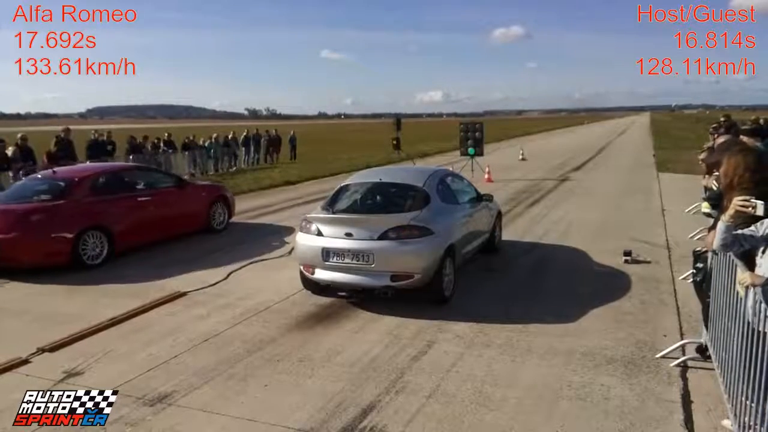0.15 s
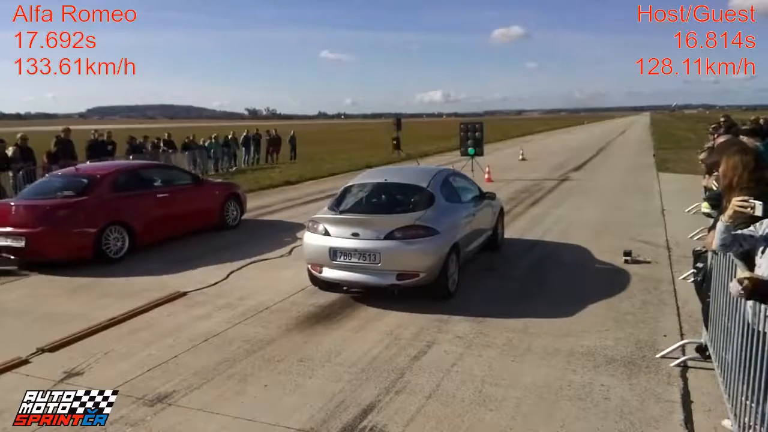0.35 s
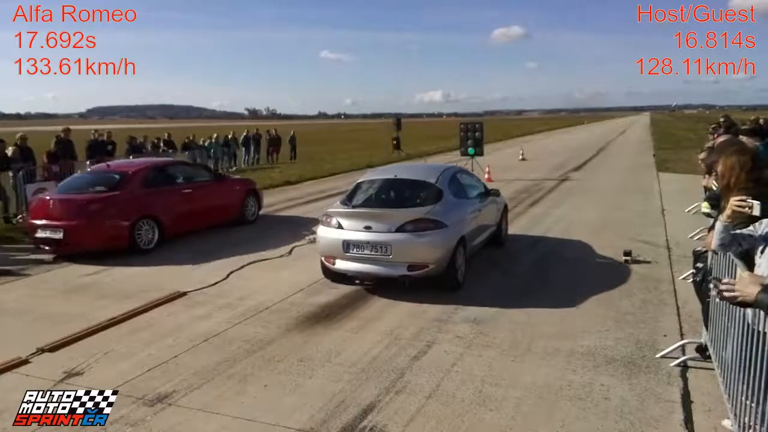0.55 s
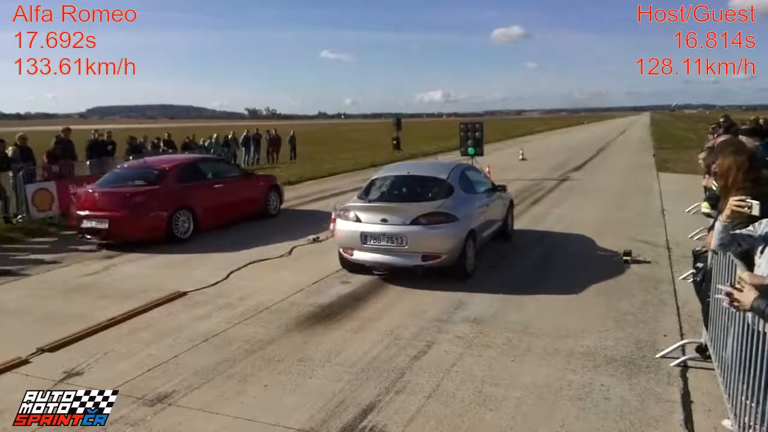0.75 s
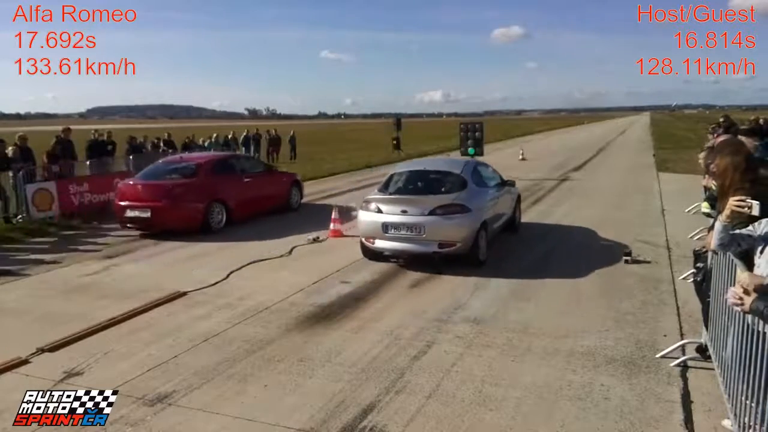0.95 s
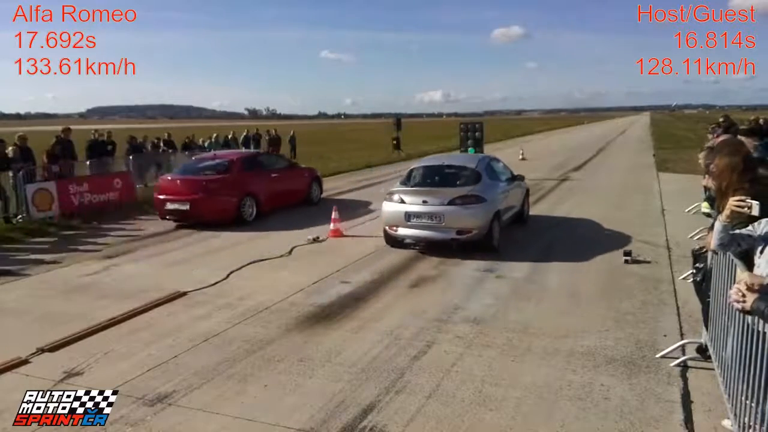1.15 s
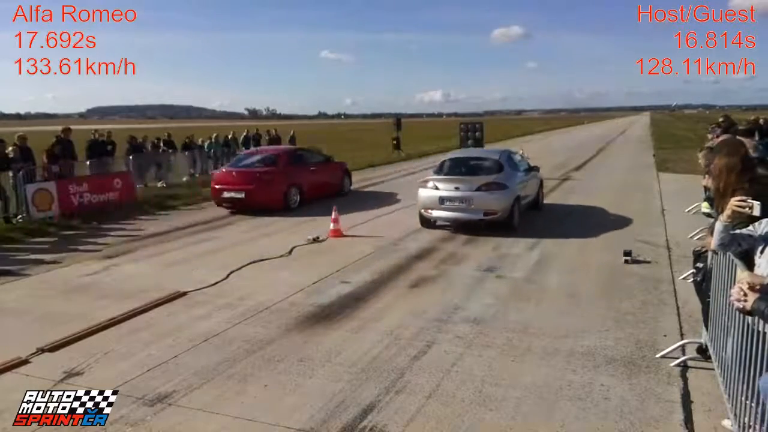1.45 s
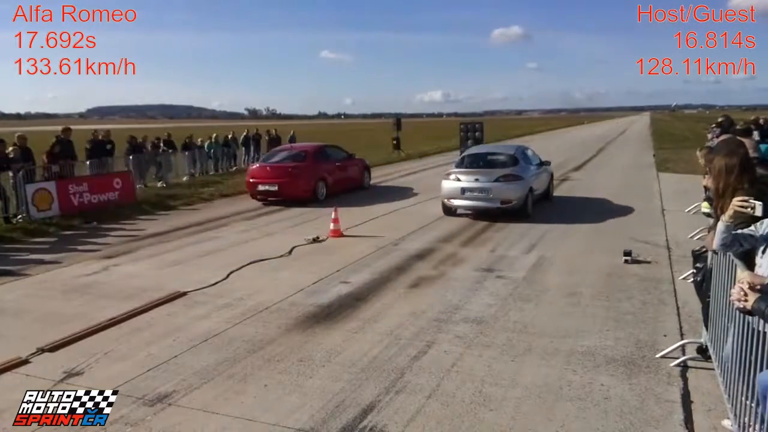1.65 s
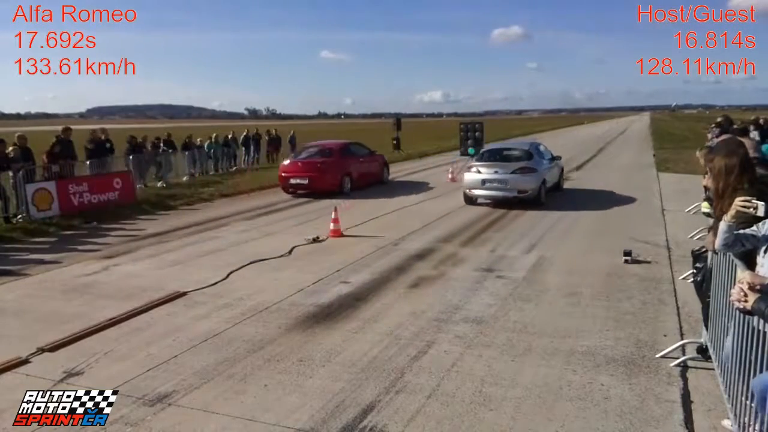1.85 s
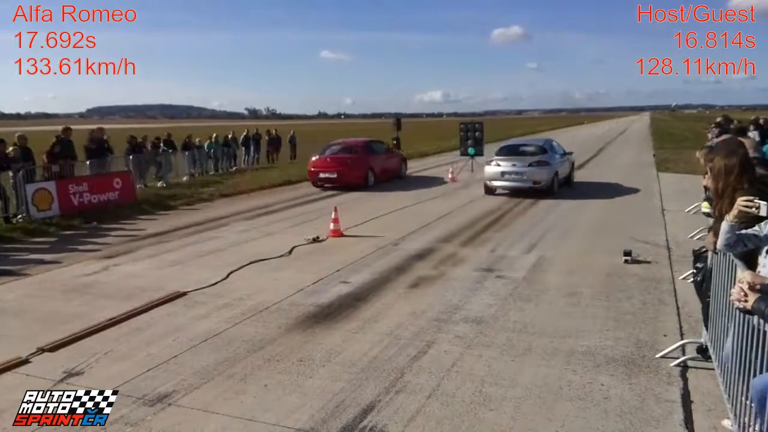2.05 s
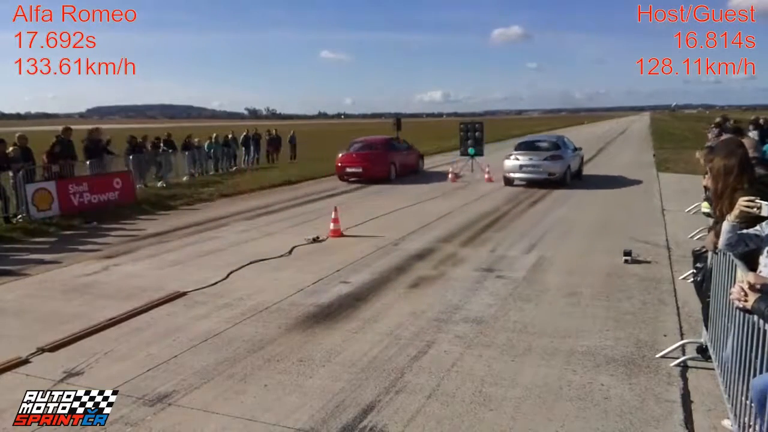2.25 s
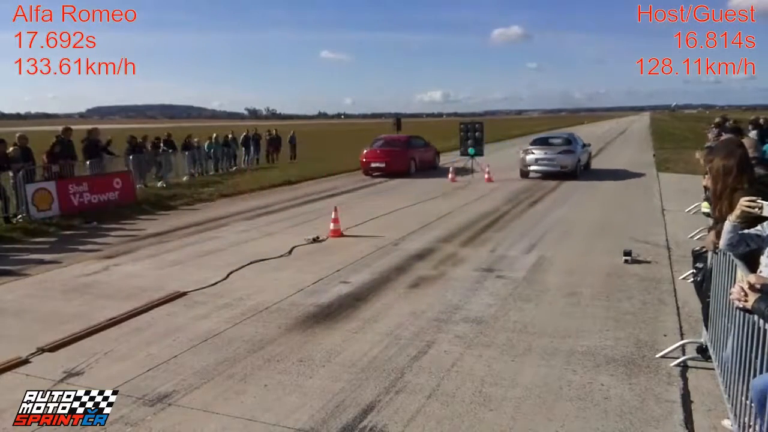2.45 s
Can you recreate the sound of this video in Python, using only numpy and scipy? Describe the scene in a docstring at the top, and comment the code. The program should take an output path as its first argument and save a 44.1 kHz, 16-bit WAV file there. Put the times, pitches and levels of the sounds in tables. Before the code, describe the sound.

Car tyres squeal harshly on concrete as two cars launch, engines droning underneath, wind buffeting

```python
"""Two cars launch side by side on a concrete airstrip and pull away from the onlookers.
Engines and rush come first; at 0.2 s the far tyres chirp briefly and the far engine bogs down.
The near tyres squeal in stick-slip for about two seconds, loud enough to overload the microphone;
a low rumble swells under the squeal from 0.65 to 1 s. Wind buffets the microphone from 1.6 s;
the far engine picks up again, and the near one once its tyres grip.
Tones are sums of sine waves with unsteady pitch and level; the rush, rumble, air and wind are shaped noise."""
import sys
import numpy as np
from scipy import signal
from scipy.fft import rfft, irfft
from scipy.io import wavfile
from scipy.ndimage import uniform_filter1d

SR = 44100
rng = np.random.default_rng(int(sys.argv[2]) if len(sys.argv) > 2 else 0)


def digitize_waveform(pressure):
    """Quantize a signal to 16-bit integers and store it at the path in sys.argv[1].

    Rows of a 2-D input are taken as channels; values are limited to [-1, 1].
    """
    field = np.atleast_2d(pressure).T
    bounded = np.clip(field, -1, 1)
    quanta = np.round(bounded * 32767).astype(np.int16)
    wavfile.write(sys.argv[1], SR, quanta)


N = 114660  # length in samples, 2.6 s
T = np.arange(N) / SR  # time of each sample, s
HZ = np.fft.rfftfreq(N, 1 / SR)  # frequency of each spectrum bin


def amp(db):
    """Turns decibels into gain."""
    return 10 ** (np.asarray(db) / 20)


def unit(x):
    """Scales a signal to an average (rms) level of 1."""
    return x / np.sqrt(np.mean(x ** 2) + 1e-20)


def curve(table, axis=1):
    """Draws straight lines through one column of a time table, giving a value at every sample."""
    rows = np.array(table, float)
    return np.interp(T, rows[:, 0], rows[:, axis])


def turns(hz):
    """Adds up a changing frequency into the running phase of a sine wave, in radians."""
    return 2 * np.pi * np.cumsum(hz) / SR


def filtered_noise(gain):
    """White noise with each frequency bin multiplied by a gain."""
    return irfft(rfft(rng.standard_normal(N)) * gain, N)


def noise(spectrum):
    """Noise of rms 1 whose strength at each frequency follows a table."""
    f, db = np.transpose(spectrum)
    bin_db = np.interp(np.log(HZ + 1), np.log(f + 1), db)
    return unit(filtered_noise(amp(bin_db)))


def wander(low_hz, high_hz):
    """Random motion of rms 1, mostly between two rates."""
    without_slow = HZ ** 2 / (HZ ** 2 + low_hz ** 2)
    without_fast = 1 / np.sqrt((1 + HZ / low_hz) * (1 + (HZ / high_hz) ** 4))
    return unit(filtered_noise(without_slow * without_fast))


# Colour of the open-air background. Each row: frequency in Hz, relative strength in dB per Hz.
AIR_SPECTRUM = [(15, -29.5), (25, -0.5), (36, -20.5), (80, -31.5), (139, -15), (197, -16), (265, -30.5),
                (481, -19.5), (990, -21.5), (7980, -38.5), (9500, -45), (12400, -88.5), (20900, -120)]


def open_air():
    """The steady background of the open airstrip, as noise."""
    return noise(AIR_SPECTRUM) * amp(-38)


# Colour of the wind on the microphone. Each row: frequency in Hz, relative strength in dB per Hz.
WIND_SPECTRUM = [(0, -46), (2, -1), (4, 1), (8, -9.5), (14, -22.5), (30, -33), (100, -50), (400, -80.5)]
# Gusts. Each row: time in seconds, level in dB.
WIND_LEVEL = [(0, -42), (.3, -28.5), (1.55, -34), (1.68, -11), (1.8, -27), (2.0, -19), (2.3, -19),
              (2.42, -29), (2.56, -20), (2.6, -30)]


def wind():
    """Wind pushes on the microphone: very low noise that swells in gusts."""
    return noise(WIND_SPECTRUM) * amp(curve(WIND_LEVEL))


# Colour of the low overload rumble. Each row: frequency in Hz, relative strength in dB per Hz.
OVERLOAD_RUMBLE_SPECTRUM = [(20, -9.5), (45, 4.5), (120, -4.5), (250, -0.5), (500, -40.5), (1200, -49)]
# Its rise and fall. Each row: time in seconds, level in dB.
OVERLOAD_RUMBLE_LEVEL = [(0, -46), (.25, -45), (.35, -39), (.615, -49.5), (.65, -31), (.83, -25),
                         (.88, -36), (.95, -27.5), (1.02, -38.5), (1.25, -44), (1.5, -55), (2.6, -51)]


def overload_rumble():
    """Low rumble under the loudest squeal, probably the microphone overloading: low noise."""
    return noise(OVERLOAD_RUMBLE_SPECTRUM) * amp(curve(OVERLOAD_RUMBLE_LEVEL))


# Colour of the rush of engines and road. Each row: frequency in Hz, relative strength in dB per Hz.
RUSH_SPECTRUM = [(180, -17.5), (300, -9), (490, -11.5), (575, -7.5), (725, -10), (1330, -2), (1580, -3),
                 (6340, -14.5), (7990, -10.5), (9500, -21.5), (12400, -48.5), (20900, -120)]
# Its rise and fall. Each row: time in seconds, level in dB before a slight flicker.
RUSH_LEVEL = [(0, -31.5), (.2, -27), (.35, -23.5), (.6, -27), (.8, -25.5), (1.2, -37.5), (1.8, -40.5),
              (2.2, -47.5), (2.6, -45)]


def rush():
    """The breathy rush of engines and road: noise with a slight, quick flicker in level."""
    flicker_db = 0.4 * wander(low_hz=30, high_hz=250)
    return noise(RUSH_SPECTRUM) * amp(curve(RUSH_LEVEL) + flicker_db)


PIPE_HZ, PIPE_WIDTH_HZ = 297, 51  # exhaust pipe resonance: centre, and distance where its dB boost halves


def engine(table, orders, waver, flutter_db, pipe_db):
    """Exhaust orders follow the engine speed, each a little unsteady, and swell near the pipe resonance."""
    hz = curve(table)
    phase = turns(hz * (1 + waver * wander(low_hz=18, high_hz=40)))
    tone = np.zeros(N)
    for order, db in orders:
        pipe_boost_db = pipe_db / (1 + ((order * hz - PIPE_HZ) / PIPE_WIDTH_HZ) ** 2)
        unsteady_db = flutter_db * wander(low_hz=16, high_hz=40)
        start_phase = 2 * np.pi * rng.random()
        tone += amp(db + pipe_boost_db + unsteady_db) * np.sin(order * phase + start_phase)
    return unit(tone) * amp(curve(table, axis=2))


# Far engine. Each row: time in seconds, crank turns per second, level in dB.
FAR_ENGINE = [(0, 120, -33.5), (.12, 94, -36.5), (.25, 77, -63), (.6, 62, -56), (1.3, 55, -38.5),
              (1.7, 56.3, -44.5), (1.82, 67.5, -31.5), (1.95, 74, -40), (2.1, 78.6, -42), (2.3, 87, -43),
              (2.6, 101, -36.5)]
# Its exhaust orders. Each row: multiple of the crank rate, relative level in dB before boost and flutter.
FAR_ORDERS = [(1.5, 1), (3, 1.5), (4, -2.5), (4.5, -17.5), (5, -10), (6, -5.5), (7.5, -10.5), (9, -11.5)]


def far_engine():
    """The far engine bogs down, then picks up speed again."""
    return engine(FAR_ENGINE, FAR_ORDERS, waver=0.0044, flutter_db=2.2, pipe_db=9)


# Near four-cylinder engine. Each row: time in seconds, firings per second (Hz), level in dB.
NEAR_ENGINE = [(0, 169.5, -23.5), (.09, 188.7, -23.5), (.16, 190, -25), (.26, 169.6, -24.5),
               (.42, 176.8, -25.5), (.58, 180, -26), (.9, 171.2, -25.5), (1.48, 155.3, -30.5),
               (2.0, 140.1, -30), (2.27, 133.3, -36.5), (2.41, 135, -33), (2.6, 151.7, -35)]
# Its exhaust orders. Each row: multiple of the firing rate, relative level in dB before boost and flutter.
NEAR_ORDERS = [(.5, -18.5), (1, 1.5), (1.5, -30), (2, -17.5), (2.5, -22), (3, -19.5), (4, -23)]


def near_engine():
    """The near engine sinks in speed while its tyres spin, then climbs once they grip."""
    return engine(NEAR_ENGINE, NEAR_ORDERS, waver=0.0067, flutter_db=1.4, pipe_db=4)


# Overtones of the stick-slip cycle. Each row: multiple of the pitch, relative level in dB before wandering.
OVERTONES = [(2, -11), (3, -27), (4, -39), (5, -47), (6, -44)]


def tyre(hz, rough, edge, jitter, flutter_db):
    """Rubber sticks and slips on concrete: pitch warbles, edge comes and goes, and broken grip falters."""
    # warble and jitter are fractions of the pitch, growing with roughness (0 to 1)
    warble = 0.035 * np.sqrt(rough) * wander(low_hz=19, high_hz=42)
    fast_jitter = rough * jitter * wander(low_hz=58.3, high_hz=165)
    phase = turns(hz * (1 + warble + fast_jitter))
    overtones = np.zeros(N)
    for multiple, db in OVERTONES:
        overtones += amp(db + 2.6 * wander(low_hz=5, high_hz=109)) * np.sin(multiple * phase)
    bite = edge * amp(2.47 * wander(low_hz=6, high_hz=35))
    lost_grip = np.maximum(wander(low_hz=27.5, high_hz=106) + 0.24, 0)
    grip = amp(-rough * flutter_db * lost_grip)
    return unit(grip * (np.sin(phase) + bite * overtones))


# Far tyres. Each row: time in seconds, pitch in Hz, level in dB.
CHIRP = [(.22, 1395, -75), (.265, 1340, -15), (.31, 1358, -32), (.38, 1360, -23), (.5, 1462, -37),
         (.62, 1296, -31), (.7, 1400, -64)]


def far_chirp():
    """The far car's tyres stick and slip in one short, rough chirp."""
    tone = tyre(curve(CHIRP), rough=0.99, edge=1.0, jitter=.02, flutter_db=11.5)
    return tone * amp(curve(CHIRP, axis=2))


def scrub(hz, width_hz):
    """Loose sliding rings the tread in a fuzzy band around the squeal."""
    slow_gain = 1 / (1 + (HZ / width_hz) ** 4)
    phase = turns(hz)
    # two slow noises on a cosine and a sine carry the fuzz up to the squeal's pitch
    return unit(filtered_noise(slow_gain) * np.cos(phase) + filtered_noise(slow_gain) * np.sin(phase))


# Pitch of the near tyres. Each row: time in seconds, stick-slip pitch in Hz.
SQUEAL_PITCH = [(.22, 1710), (.255, 1610), (.28, 1658), (.345, 1550), (.40, 1690), (.47, 1670), (.5, 1638),
                (.535, 1734), (.585, 1645), (.615, 1748), (.65, 1552), (.665, 1592), (.685, 1473),
                (.71, 1558), (.79, 1557), (.82, 1513), (.85, 1558), (1.0, 1483), (1.08, 1463), (1.22, 1508),
                (1.4, 1453), (1.52, 1456), (1.7, 1440), (1.84, 1406), (2.09, 1436), (2.19, 1640)]
# Loudness of the near tyres. Each row: time in seconds, level in dB.
SQUEAL_LEVEL = [(.219, -59), (.229, -11), (.3, -6.5), (.32, -16), (.35, -8.5), (.385, -20), (.4, -7),
                (.425, -14), (.465, -2.5), (.485, -12.5), (.538, -6.5), (.56, -28), (.6, -15.5),
                (.633, -14), (.643, 0), (.7, 3), (.85, -3.5), (1.12, -5), (1.143, -23), (1.153, -9),
                (1.185, -3.5), (1.24, -18.5), (1.249, -8.5), (1.3, -12), (1.41, -7), (1.46, -10.5),
                (1.52, -7.5), (1.544, -25), (1.552, -6), (1.65, -11), (1.81, -8.5), (1.97, -9),
                (2.03, -19.5), (2.06, -11), (2.105, -25.5), (2.13, -47), (2.162, -42), (2.172, -32),
                (2.2, -39.5), (2.23, -74)]
# Feel of the near tyres. Each row: time in seconds, shift of all overtones in dB, roughness from 0 to 1.
SQUEAL_TEXTURE = [(.25, -0.5, 0.34), (.35, 2.5, 0.8), (.45, -10, 0.57), (.6, -7, 0.6), (.7, -2, 0.29),
                  (.8, 0, 0.89), (1.05, 4, 0.99), (1.2, 1.5, 0.87), (1.4, 1, 0.79), (1.65, -1, 0.93),
                  (1.9, -6, 0.48), (2.1, -2, 0.53)]
# Colour of the grit under the sliding rubber. Each row: frequency in Hz, relative strength in dB per Hz.
GRIT_SPECTRUM = [(300, -24), (1500, -11.5), (2200, -10.5), (2700, 11.5), (3550, -1.5), (4100, 15.5),
                 (5200, -7.5), (5900, -12.5), (8200, -2.5), (9500, -28.5)]


def near_squeal():
    """Both driven tyres of the near car stick and slip, the second dulled behind the body, over grit."""
    hz = curve(SQUEAL_PITCH)
    edge = amp(curve(SQUEAL_TEXTURE))
    rough = curve(SQUEAL_TEXTURE, axis=2)
    first = tyre(hz, rough, edge, jitter=0.029, flutter_db=4)
    # the second tyre is pitched 1.2 % higher
    second = tyre(hz * 1.012, rough, 0.42 * edge, jitter=0.048, flutter_db=8.5)
    fuzz = rough * scrub(hz, width_hz=220)
    tyres = unit(first + amp(-9.5) * second + amp(-14.5) * fuzz)
    outline = abs(signal.hilbert(tyres))  # the grit swells and fades with the squeal
    grit = amp(-31) * noise(GRIT_SPECTRUM) * outline
    return (tyres + grit) * amp(curve(SQUEAL_LEVEL))


def airstrip(x, wet_db, t60):
    """A short scatter of echoes from car bodies, barriers and the crowd, fading 60 dB in t60 seconds."""
    delay = rng.uniform(0.00302, .07, size=40)  # seconds
    taps = np.zeros(SR)
    taps[(delay * SR).astype(int)] = rng.choice([-1, 1], size=40) * amp(-60 * delay / t60)
    echoes = signal.fftconvolve(x, taps / np.linalg.norm(taps))[:N]
    return x + amp(wet_db) * echoes


def scene():
    """Adds air, wind, rumble, rush and engines to the tyres, which alone get echoes."""
    background = open_air() + wind() + overload_rumble() + rush()
    engines = far_engine() + near_engine()
    tyres = airstrip(near_squeal() + far_chirp(), wet_db=-6, t60=0.089)
    return (background + engines + tyres)[None]


LIMIT_DB, LIMIT_SHARE = -5, 0.33  # threshold, and the share of the excess dB that is taken away
LIMIT_WINDOW_S, RECOVER_DB_PER_S = 0.0037, 158.5  # averaging time, and how fast the held level falls


def limiter(x):
    """Turns the gain down quickly on loud peaks and lets it recover."""
    power = uniform_filter1d((x ** 2).mean(0), int(LIMIT_WINDOW_S * SR))
    level_db = 10 * np.log10(abs(power) + 1e-12)
    # a running maximum on a rising ramp makes the held level fall steadily after each peak
    ramp_db = T * RECOVER_DB_PER_S
    held_db = np.maximum.accumulate(level_db + ramp_db) - ramp_db
    return x / amp(LIMIT_SHARE * np.maximum(held_db - LIMIT_DB, 0))


CLIP_LEVEL, CLIP_HARDNESS, CLIP_BIAS = 0.93, 5.7, .015  # ceiling, sharpness of its knee, lopsidedness


def record(dry):
    """The loudest squeal gets past the limiter and clips, slightly lopsided; then the treble is cut."""
    # clipping runs at twice the sample rate, to reduce false tones
    fine = signal.resample_poly(limiter(dry), 2, 1, axis=1, padtype="edge") + CLIP_BIAS
    squash = (1 + abs(fine / CLIP_LEVEL) ** CLIP_HARDNESS) ** (1 / CLIP_HARDNESS)
    clipped = fine / squash - CLIP_BIAS
    lowpass = signal.ellip(8, .05, 50, 9350, fs=2 * SR, output="sos")  # cutoff in Hz
    return signal.sosfiltfilt(lowpass, clipped)[:, ::2]


dry = scene()
out = record(dry)
digitize_waveform(out)
```